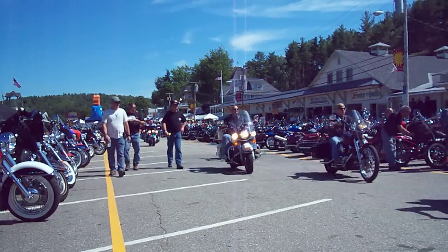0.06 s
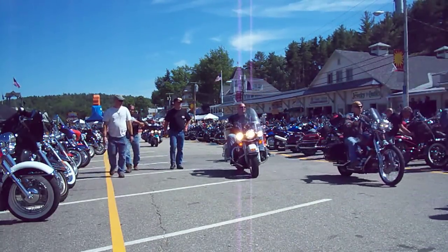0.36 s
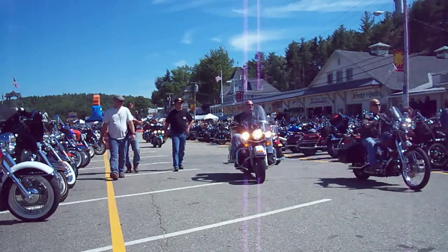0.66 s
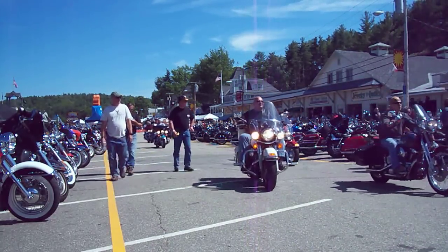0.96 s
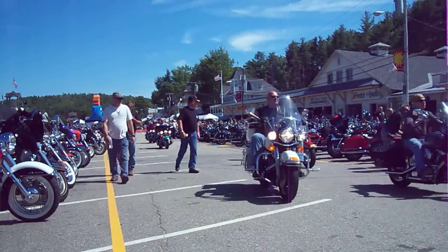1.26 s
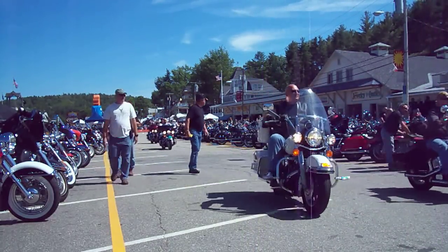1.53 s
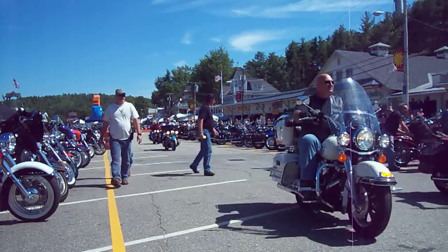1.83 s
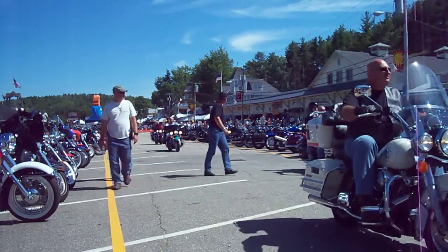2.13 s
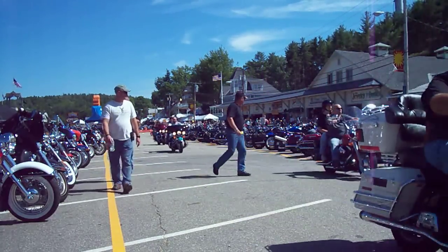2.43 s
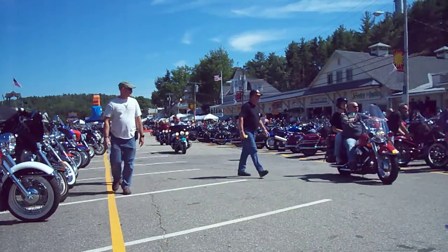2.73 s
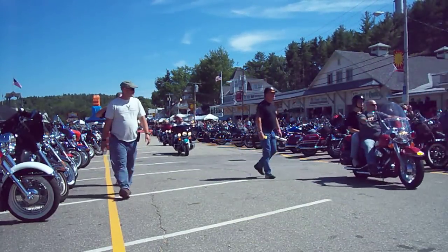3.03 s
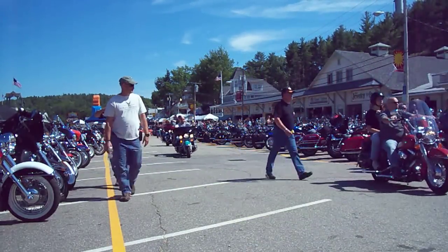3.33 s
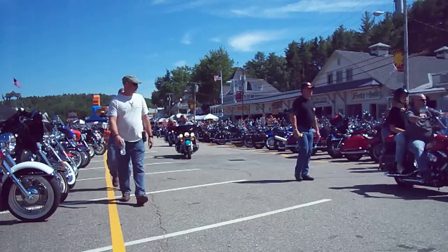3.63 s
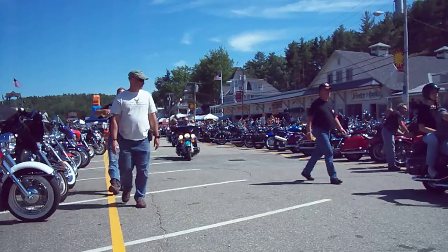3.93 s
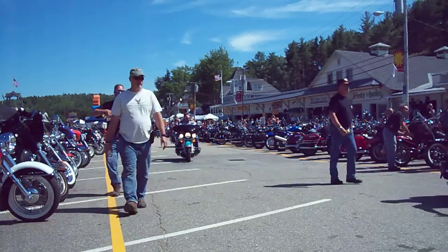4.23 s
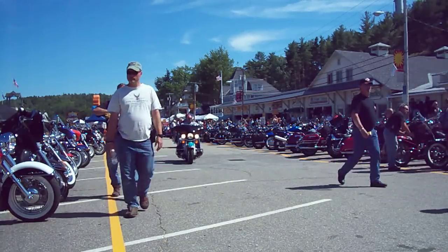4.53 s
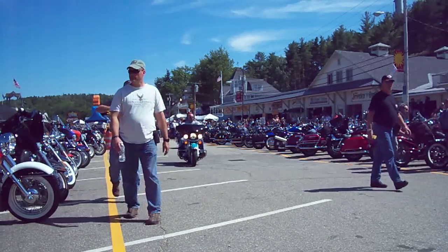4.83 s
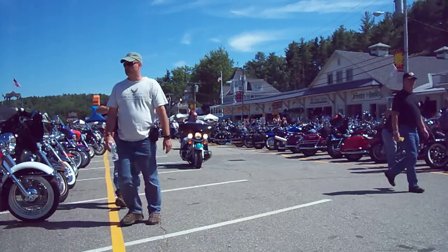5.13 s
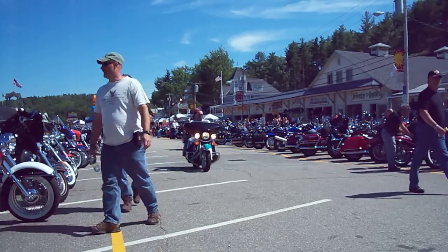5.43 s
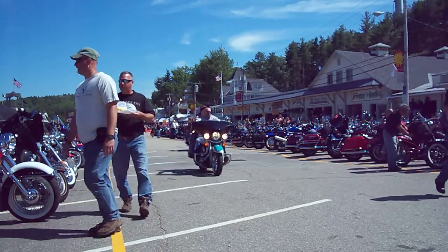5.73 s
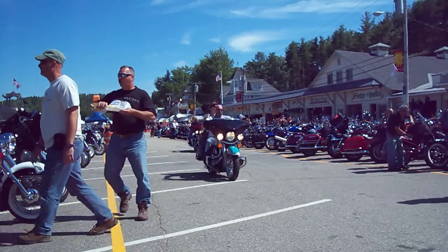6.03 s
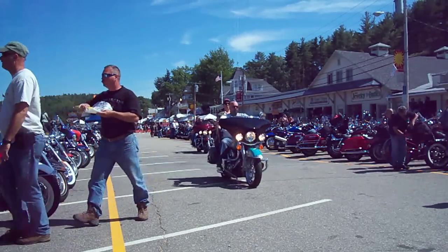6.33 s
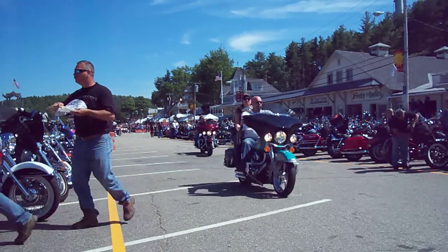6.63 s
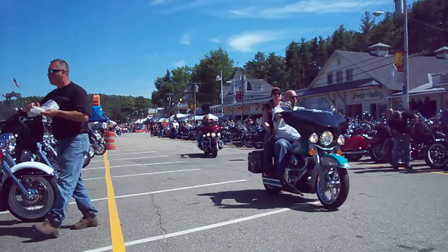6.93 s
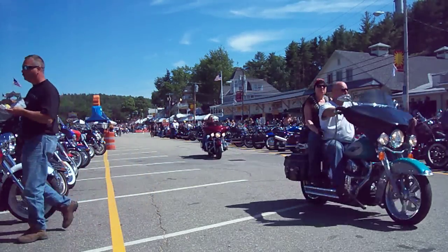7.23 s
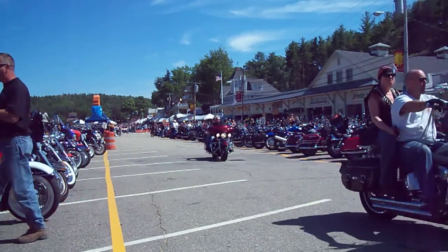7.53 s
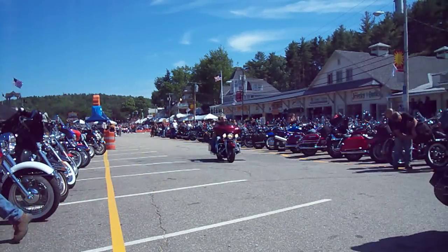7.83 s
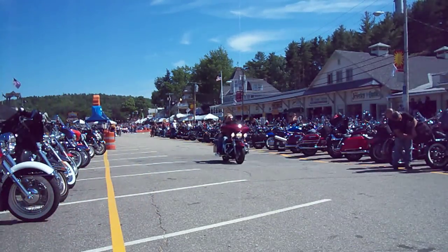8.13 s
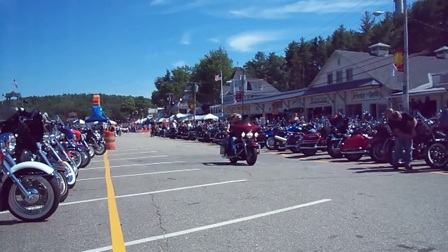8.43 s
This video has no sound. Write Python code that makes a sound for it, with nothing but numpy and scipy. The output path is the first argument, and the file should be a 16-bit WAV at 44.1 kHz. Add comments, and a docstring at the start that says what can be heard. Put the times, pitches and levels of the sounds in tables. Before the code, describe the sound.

Big two-cylinder motorcycles pass on an outdoor street, their exhausts thumping in a deep, limping beat. Distant engines rumble throughout, and buildings return dull echoes. At the start the first bike is already going by, easing off the throttle, with a pop near 1.2 seconds and two harder ones around 2.4. A second, well muffled bike passes at about 2 seconds, ticking lightly. From 3.5 seconds a third pulls away with rising revs, a booming drone strongest around 4 seconds and sharp spits until about 4.5; its revs drop after 5 seconds. The fourth then approaches, chugging just above idle, with a few hard firings around 6 seconds. It passes close to the microphone near 7.8 seconds, the loudest moment, with hollow barks, raspy gas and occasional missed beats. Its open pipes crack with a metallic ring until the end, at about 8.7 seconds.

```python
"""On a street lined with houses, four big V-twin motorcycles roll past in turn, the last one close by.
Each time a cylinder fires, it thumps the exhaust pipe, barks at its mouth and lets out a rasp of gas.
The two cylinders fire at uneven gaps, so the beat limps. The close bike's open pipes also crack and ring.
House fronts and parked cars send back dull echoes, and more motorcycles rumble further down the street."""
import sys
import numpy as np
from scipy import signal
from scipy.fft import rfft, irfft, next_fast_len
from scipy.io import wavfile
from scipy.ndimage import uniform_filter1d

SR = 44100
rng = np.random.default_rng(int(sys.argv[2]) if len(sys.argv) > 2 else 0)


def store_wav(level_fs):
    """Save 16-bit WAV to argv[1]."""
    pcm = np.round(np.clip(np.atleast_2d(level_fs), -1, 1) * 32767)
    wavfile.write(sys.argv[1], SR, pcm.T.astype(np.int16))


N = 381897
TIME = np.arange(N) / SR
TOP_HZ = 8250  # the treble ends about here
CLOSE_PATH = (31.16, 3.09)  # the close bike's route: to_go_m at the start, closest_m

# the boomy bike's engine speed (each cylinder fires once a cycle): time_s, cycles_per_s
BOOMY_SPEED = [(2.2, 9.3), (2.7, 9.623), (3.6, 10.866), (3.82, 12.787), (4.03, 13.114), (4.22, 13.959),
               (4.9, 14.494), (5.15, 14.6), (5.867, 11.594), (6.591, 13.146)]
# the notes a well muffled pipe rings at: pitch_hz, width_hz, level_db
MUFFLED_PIPE = [(58, 28.4, -5.5), (82.7, 27.3, -6), (133.6, 4.2, -5.5), (237, 47, -38)]
# the notes in the bark at a muffled pipe's mouth: pitch_hz, width_hz, level_db
MUFFLED_MOUTH = [(482, 120, -3.5), (665, 177, -0.5), (1130, 270, -11), (1540, 450, -18)]
# the tone of gas hissing softly out of a pipe: pitch_hz, level_db
SOFT_GAS = [(700, 3), (1600, 6.5), (2500, 4), (4300, 1.5), (6000, -0.5), (8000, -9.5)]


def close_bike():
    """Open pipes chug by at little more than idle, now cracking, now missing a beat."""
    # engine speed: time_s, cycles_per_s
    speed = [(5.274, 8.779), (6.216, 10.049), (6.838, 10.43), (8.27, 10.777)]
    # the hardest firings and the misfires: time_s, extra_db
    uneven_burns = [(5.2, 4.5), (5.86, 4), (5.96, 6), (6.018, 5), (6.062, -0.5), (6.46, 3.5), (7.23, 0.5),
                    (7.38, 5), (7.57, 3), (7.61, 4), (7.66, 2), (7.705, -12.5), (7.757, 4), (7.85, 1),
                    (7.797, -4.5), (7.945, -2.5), (7.985, -26.5), (8.04, 3.5), (8.17, -6), (8.225, 1),
                    (8.355, -0.5), (8.545, -1), (8.595, -7.5), (8.635, 2)]
    # notes of each cylinder's pipe, the rear pipe's overtones and the bark: pitch_hz, width_hz, level_db
    front_pipe = [(81.6, 12, 8.5), (96.2, 4.9, 8), (169, 30, -1.5)]
    rear_pipe = [(81, 11, -11), (106.3, 6.1, 4), (169, 43, -8.5)]
    overtones = [(281.8, 13, 1.5), (318.5, 47, -11)]
    mouth = [(485, 40, 1.5), (695, 185, 2), (1005, 150, -2), (1166, 70, 0.5), (1784, 780, -8.5)]
    # the tone of the escaping gas: pitch_hz, level_db
    gas = [(700, -11), (1500, 3), (2100, 2.5), (2550, 6), (3400, 5.5), (4500, 4.5), (5800, -2.5), (7200, 3),
           (8200, -10.5)]
    # loudness of thump, bark and rasp, then of the overtones: level_db, behind_db, end_on_db, pull_db
    voice = [(-17, 9.6, 2.6, 4), (-35.5, 3.3, 4.8, 3.6), (-34, 4.35, 0.63, 0.5)]
    overtone_voice = [(-27.5, 3.5, 4, -0.5)]
    times, level_db = firings(speed, front_fires_s=5.0327, rear_db=-.2, jitter_s=.0002)
    rear = level_db < 0
    level_db = with_burns(times, level_db, uneven_burns)
    push_db = .37 * np.minimum(level_db, 0)  # a weak burn still pushes air
    front_chug = thump(times[~rear], push_db[~rear], front_pipe, low_hz=66, high_hz=165, spread_db=.5)
    rear_chug = thump(times[rear], push_db[rear], rear_pipe, low_hz=66, high_hz=165, spread_db=.5)
    thumps = unit_level(front_chug + from_db(-3) * rear_chug)
    # the bark comes first, then the rasp, then the crack
    pipes = exhaust(times, level_db, passing_gains(CLOSE_PATH, voice, speed), thumps, mouth, gas,
                    rise_s=.0014, fall_s=.0032, tail_db=-14.5, spread_db=.7, bounce=.6,
                    bark_s=.0047, rasp_lag_s=.005)
    crack_times = times + .0056
    throb = thump(times[rear], push_db[rear], overtones, low_hz=220, high_hz=320, spread_db=1)
    throb = unit_level(resonate(throb, hz=290, width_hz=110))  # takes a moment to build
    throb_gain, = passing_gains(CLOSE_PATH, overtone_voice, speed)
    return pipes + throb_gain * throb + hollow_notes(times, level_db) + crack_ring(crack_times, level_db)


def hollow_notes(times, level_db):
    """Each gush rings the open pipe's hollow notes, which beam their own ways and rise as it passes."""
    # hollow notes: pitch_hz, level_db, loudest_view (-1 ahead, 1 behind), loss_db per unit of view away
    notes = [(766, -30.5, -0.077, 9.5), (1023.2, -34, .45, 20.5), (1086, -33.5, -.91, 69.5),
             (1971, -42, -.9, 58.5)]
    glide_hz, width_hz = 125, 100
    near_db, view = drive_past(CLOSE_PATH)
    flow = gush(clicks(times, level_db / 3, spread_db=.5), fall_s=.004)
    pop_index = np.searchsorted(np.sort(times), TIME)
    sound = 0
    for hz, db, loudest_view, loss_db in notes:
        heat = 1 + .025 * rng.standard_normal(len(times) + 1)  # each pop's heat shifts the pitch
        tone = np.exp(2j * np.pi * np.cumsum(hz * heat[pop_index] + glide_hz * view) / SR)
        ringing = (cut(flow / tone, width_hz / 2, "low") * tone).real  # a band around the moving pitch
        sound = sound + from_db(db + near_db - loss_db * abs(view - loudest_view)) * unit_level(ringing)
    return sound


def crack_ring(times, level_db):
    """Each crack of the open pipe rings like metal: a narrow band of the gas jet, at a new pitch."""
    # the cracks that stand out: time_s, pitch_hz, extra_db
    cracks = [(7.38, 5200, -1), (7.42, 5900, -1.5), (7.57, 5200, -1), (7.61, 4800, -1), (7.66, 4600, 1.5),
              (7.76, 4100, 1.5), (7.85, 5900, -2), (8.04, 5400, -6), (8.08, 4700, 0), (8.13, 3500, 3),
              (8.225, 4400, 4.5), (8.265, 3500, 3), (8.315, 3100, 10), (8.355, 6000, 7), (8.41, 5300, 8.5),
              (8.45, 5700, 7.5)]
    centre_hz, scatter_octaves, width_hz = 4500, .24, 700
    near_db, view = drive_past(CLOSE_PATH)
    starts = np.sort(times)
    hz = centre_hz * 2 ** (scatter_octaves * rng.standard_normal(len(times)))
    for time_s, pitch_hz, _ in cracks:
        hz[np.argmin(abs(starts - time_s))] = pitch_hz
    level_db = with_burns(times, level_db, [(time_s, db) for time_s, _, db in cracks])
    tone = np.exp(2j * np.pi * np.cumsum(hz[np.searchsorted(starts, TIME) - 1]) / SR)
    band = cut(rng.standard_normal(N) + 1j * rng.standard_normal(N), width_hz / 2, "low")
    pulses = clicks(times, level_db, spread_db=.5)
    pops = puffs(pulses, rise_s=.00083, fall_s=.003, tail_db=-22, tail_s=.018)
    gain = from_db(-36.5 + near_db - 10 * view ** 2)  # the ring is beamed sideways
    return gain * unit_level(pops * (band * tone).real)


def boomy_bike():
    """The third bike pulls away with deep, steady thumps while one cylinder spits sharply."""
    # the notes its pipe rings at: pitch_hz, width_hz, level_db
    pipe = [(65, 16, -1), (84, 47, -4), (147, 27, 2)]
    # hard firings at full pull: time_s, extra_db
    pops = [(3.975, 1.8), (4.2, 3.7), (4.345, 4), (4.415, 4.2), (4.485, 7.1)]
    # the tone of the escaping gas: pitch_hz, level_db
    gas = [(700, -23.5), (1700, -5), (2900, 3), (4200, -4), (5600, -8.5), (8000, -9.5)]
    # loudness of thump, bark and rasp: level_db, behind_db, end_on_db, pull_db
    voice = [(-13.5, 1, -9, 0.33), (-47, 4.5, 5.5, 0.59), (-46, 13.5, -23, 0.46)]
    times, level_db = firings(BOOMY_SPEED, front_fires_s=3.468, rear_db=-1, jitter_s=.0001)
    thumps = thump(times, level_db, pipe, low_hz=40, high_hz=130, spread_db=.6)
    times, level_db = firings(BOOMY_SPEED, front_fires_s=3.468, rear_db=-10.5)  # the front one spits
    gains = passing_gains((14, 7.7), voice, BOOMY_SPEED)
    return exhaust(times, with_burns(times, level_db, pops), gains, thumps, MUFFLED_MOUTH, gas,
                   rise_s=.0027, fall_s=.0019, tail_db=-33.5, spread_db=.5, bounce=-.5, bark_s=.0048)


def boomy_drone():
    """A firm tone follows the boomy bike's engine speed and swells as the revs reach the pipe's boom."""
    # how the drone swells and fades: time_s, level_db
    swell = [(3.5, -50), (3.8, -24), (4.05, -22), (4.3, -26), (5.2, -30), (5.8, -55)]
    waves_per_cycle = 12
    cycles = np.cumsum(curve(BOOMY_SPEED)) / SR
    wobble_db = np.interp(cycles, np.arange(200), 1.5 * rng.standard_normal(200))  # no two cycles alike
    return from_db(curve(swell) + wobble_db) * np.sqrt(2) * np.sin(2 * np.pi * waves_per_cycle * cycles)


def first_bike():
    """The first bike eases off the throttle and pops a few times as it leaves."""
    # engine speed: time_s, cycles_per_s
    speed = [(.214, 13.015), (1.16, 10.806), (2.055, 9.687)]
    # the notes its pipe rings at: pitch_hz, width_hz, level_db
    pipe = [(63, 53, -9), (80.4, 25, 7), (141, 15, 0), (171.6, 11, 9), (248, 13, -9.5), (325, 58, -22)]
    # hard firings: time_s, extra_db
    pops = [(.042, 4), (.085, 1.5), (1.17, 4.5), (2.15, 1), (2.25, 1), (2.357, 11), (2.4, 9)]
    # loudness of thump, bark and rasp: level_db, behind_db, end_on_db, pull_db
    voice = [(-21.5, 1.5, -5.5, 0), (-46.5, 1, 13.5, 0), (-41.5, -6.5, 9, 0)]
    times, level_db = firings(speed, front_fires_s=.0079, rear_db=-3.5)
    thumps = thump(times, level_db / 2, pipe, low_hz=40.8, high_hz=312, spread_db=3.5)
    gains = passing_gains((1, 4.4), voice, speed)
    return exhaust(times, with_burns(times, level_db, pops), gains, thumps, MUFFLED_MOUTH, SOFT_GAS,
                   rise_s=.0016, fall_s=.015, tail_db=-6.5, spread_db=1.2, bounce=.56, bark_s=.0044)


def touring_bike():
    """The second bike is well muffled; its short puffs of gas make a light tick."""
    # engine speed: time_s, cycles_per_s
    speed = [(0, 14), (0.602, 13.4), (1.2, 12), (1.799, 11), (2.398, 11), (3.301, 11.6)]
    # loudness of thump, bark and rasp: level_db, behind_db, end_on_db, pull_db
    voice = [(-24, -2, -4.5, 0.0088), (-43, -7.5, -9.5, 0.012), (-44, 7, -0.5, 0.0054)]
    times, level_db = firings(speed, front_fires_s=.05, rear_db=0)
    thumps = thump(times, level_db, MUFFLED_PIPE, low_hz=49.3, high_hz=237, spread_db=2)
    gains = passing_gains((7.26, 5.9), voice, speed)
    return exhaust(times, level_db, gains, thumps, MUFFLED_MOUTH, SOFT_GAS,
                   rise_s=.001, fall_s=.0048, tail_db=-16, spread_db=2.5, bounce=.06, bark_s=.013)


def firings(speed, front_fires_s, rear_db, jitter_s=.00038):
    """Firing times and levels: the rear cylinder follows the front by 315 of a cycle's 720 degrees."""
    cycles = np.cumsum(curve(speed)) / SR
    cycles -= np.interp(front_fires_s, TIME, cycles)  # one front firing lands on this moment
    front = np.arange(np.floor(cycles[0]), cycles[-1])
    both = np.concatenate([front, front + 315 / 720])
    level_db = np.repeat([0, rear_db], len(front))
    heard = (both > cycles[0]) & (both < cycles[-1])
    times = np.interp(both[heard], cycles, TIME) + rng.normal(0, jitter_s, heard.sum())
    return times, level_db[heard]


def with_burns(times, level_db, burns):
    """Make the firing nearest to each listed moment harder or weaker."""
    index = np.arange(len(times))
    return level_db + sum(db * (index == np.argmin(abs(times - time_s))) for time_s, db in burns)


def clicks(times, level_db, spread_db):
    """One click for each firing; no two burns are equally strong."""
    samples = np.clip(np.round(times * SR).astype(int), 0, N - 1)
    return np.bincount(samples, from_db(level_db + spread_db * rng.standard_normal(len(samples))), N)


def thump(times, level_db, pipe, low_hz, high_hz, spread_db):
    """Each firing's rounded push of air rings the pipe; the small mouth lets out little below low_hz."""
    rings = sum(from_db(db) * resonate(clicks(times, level_db, spread_db), hz, width_hz)
                for hz, width_hz, db in pipe)
    rounded = cut(rings, high_hz, "low", order=3)
    return unit_level(cut(rounded, low_hz, "high", order=4))


def exhaust(times, level_db, gains, thumps, mouth, gas,
            rise_s, fall_s, tail_db, spread_db, bounce, bark_s, rasp_lag_s=0):
    """One bike's thumps, plus the bark of gas ringing the pipe's mouth and the rasp of it escaping."""
    thump_gain, bark_gain, rasp_gain = gains
    pulses = clicks(times, level_db, spread_db)
    flow = gush(np.sqrt(pulses), bark_s)  # a hard burn lifts the bark less than the rasp
    rings = sum((-1) ** k * from_db(db) * resonate(flow, hz, width_hz)
                for k, (hz, width_hz, db) in enumerate(mouth))
    bark = unit_level(cut(rings, 3100, "low"))
    hiss = mouth_reflections(noise(gas), times, bounce)
    rasp = unit_level(puffs(pulses, rise_s, fall_s, tail_db) * hiss)
    return thump_gain * thumps + bark_gain * bark + rasp_gain * np.interp(TIME - rasp_lag_s, TIME, rasp)


def puffs(pulses, rise_s, fall_s, tail_db, tail_s=.021):
    """Gas flow: the valve opens, most of the gas bursts out, and the rest is pushed out slowly."""
    age = TIME[:SR // 8]
    opening = 1 - np.exp(-(age / rise_s) ** 2)
    emptying = np.exp(-age / fall_s) + from_db(tail_db) * np.exp(-age / tail_s)
    return signal.oaconvolve(pulses, opening * emptying)[:N]


def gush(pulses, fall_s):
    """Swirling gas makes a burst of noise after each firing."""
    return puffs(pulses, rise_s=.0015, fall_s=fall_s, tail_db=-10) * rng.standard_normal(N)


def mouth_reflections(hiss, times, bounce, round_trip_s=.0009):
    """Tiny echoes in the pipe's mouth colour the hiss; their delay changes with the heat of each pop."""
    delays_s = round_trip_s * from_db(2.5 * rng.standard_normal(len(times) + 1))
    lag = np.round(delays_s[np.searchsorted(np.sort(times), TIME)] * SR).astype(int)
    return sum(bounce ** k * hiss[np.maximum(np.arange(N) - k * lag, 0)] for k in range(3))


def drive_past(path, road_m_per_s=4):
    """Level by distance on a straight road, and our view of the bike: -1 ahead, 0 beside, 1 behind."""
    to_go_m, closest_m = path
    along_m = road_m_per_s * TIME - to_go_m
    distance_m = np.hypot(along_m, closest_m)
    return 20 * np.log10(closest_m / distance_m), along_m / distance_m


def passing_gains(path, voice, speed, smooth_s=.4):
    """A gain for each voice row, set by the path (to_go_m, closest_m) and by how hard the engine pulls."""
    near_db, view = drive_past(path)
    speeding_up = np.maximum(np.gradient(curve(speed)) * SR, 0)  # cycles per second gained each second
    pull = uniform_filter1d(speeding_up, int(smooth_s * SR))
    return [from_db(level_db + near_db + behind_db * view + end_on_db * view ** 2 + pull_db * pull)
            for level_db, behind_db, end_on_db, pull_db in voice]


def street_echoes(bikes):
    """House fronts and parked cars send back dull echoes whose paths slowly stretch and shrink."""
    # the echoes: delay_s, level_db
    reflections = [(0.015, -14.5), (0.03, -14), (0.058, -30.5), (0.103, -28)]
    sway_share, sway_s = .15, 5
    dull = cut(bikes, 2000, "low")
    echoes = 0
    for delay_s, db in reflections:
        sway = sway_share * np.sin(2 * np.pi * (TIME / sway_s + rng.random()))
        echoes = echoes + from_db(db) * np.interp(TIME - delay_s * (1 + sway), TIME, dull, left=0)
    return echoes


def far_street():
    """Distant engines throb in a steady wash of traffic, each with a wandering throttle."""
    # the distant engines: cycles_per_s, level_db
    far_bikes = [(8.3, -23), (12.4, -19.5), (16.5, -28.5)]
    # the tone of the wash of engines and tyres: pitch_hz, level_db
    wash = [(30, -0.5), (60, -7.5), (150, 7), (250, -7.5), (450, -13), (700, -22.5), (1200, -26.5),
            (2200, -33), (4300, -33.5), (6500, -36), (8200, -46.5)]
    seconds, engines = np.arange(10), 0
    for cycles_per_s, db in far_bikes:
        wander = from_db(.6 * rng.standard_normal(len(seconds)))
        speed = np.column_stack([seconds, cycles_per_s * wander])
        times, level_db = firings(speed, front_fires_s=rng.random(), rear_db=-2.5)
        thumps = thump(times, level_db, MUFFLED_PIPE, low_hz=40.5, high_hz=241.3, spread_db=3)
        engines = engines + from_db(db) * thumps
    return engines + from_db(-23.5) * noise(wash)


def noise(tone):
    """Steady noise shaped by rows of pitch_hz, level_db."""
    hz, level_db = np.transpose(tone)
    size = next_fast_len(N)
    bins_hz = np.maximum(np.fft.rfftfreq(size, 1 / SR), 1)
    gain = from_db(np.interp(np.log(bins_hz), np.log(hz), level_db))
    gain *= np.minimum(bins_hz / hz[0], 1) ** 2 * (bins_hz < TOP_HZ * 1.1)  # trim the bottom and top
    return unit_level(irfft(rfft(rng.standard_normal(size)) * gain, size)[:N])


def resonate(x, hz, width_hz):
    """Ring at one pitch; the narrower the width, the longer the ring."""
    decay = np.exp(-np.pi * width_hz / SR)
    feedback = [1, -2 * decay * np.cos(2 * np.pi * hz / SR), decay ** 2]
    return signal.lfilter(np.array([1, 0, -1]) * (1 - decay ** 2) / 2, feedback, x + 1e-18)


def cut(x, hz, keep, order=2):
    """Keep the "low" or the "high" side of a pitch."""
    return signal.sosfilt(signal.butter(order, hz, keep, fs=SR, output="sos"), x + 1e-18)


def curve(rows):
    """Join rows of time_s, value with straight lines."""
    return np.interp(TIME, *np.transpose(rows))


def unit_level(x):
    """Scale to an average power of 1."""
    return x / np.sqrt(np.mean(x ** 2) + 1e-20)


def from_db(db):
    """Turn decibels into a gain."""
    return 10 ** (np.asarray(db) / 20)


def scene():
    """The passing bikes, their echoes and the street behind, in one channel."""
    bikes = first_bike() + touring_bike() + boomy_bike() + boomy_drone() + close_bike()
    return (bikes + street_echoes(bikes) + far_street())[None]


def record(dry):
    """Turn loud stretches down, round off the highest peaks and cut the top of the treble."""
    window_s, loud_db, cut_share, peak_limit = .14, -16, .41, .88
    level_db = 10 * np.log10(uniform_filter1d(dry ** 2, int(window_s * SR)) + 1e-9)
    held = dry * from_db(-cut_share * np.maximum(level_db - loud_db, 0))
    rounded = held / (1 + (held / peak_limit) ** 4) ** (1 / 4)
    return signal.sosfilt(signal.cheby1(12, .2, TOP_HZ, fs=SR, output="sos"), rounded)


dry = scene()
out = record(dry)
store_wav(out)
```